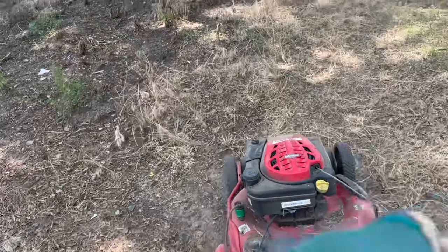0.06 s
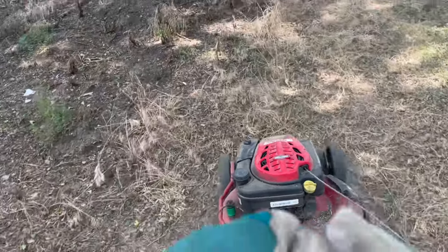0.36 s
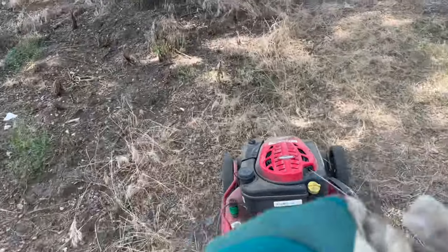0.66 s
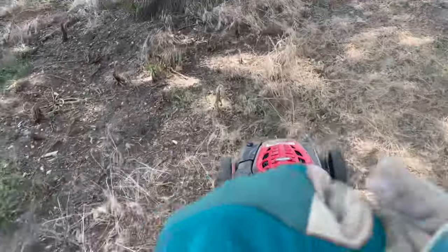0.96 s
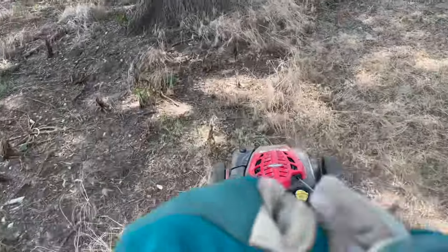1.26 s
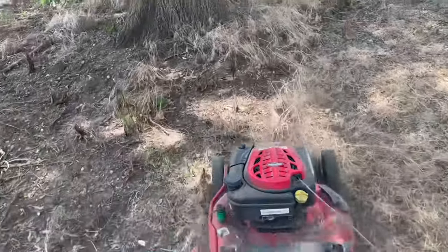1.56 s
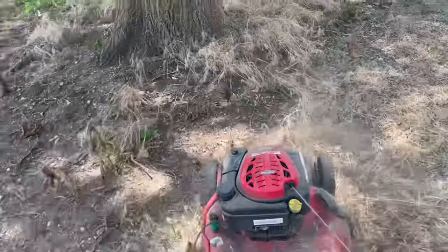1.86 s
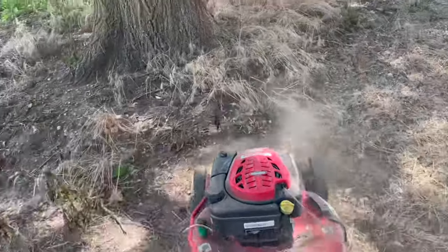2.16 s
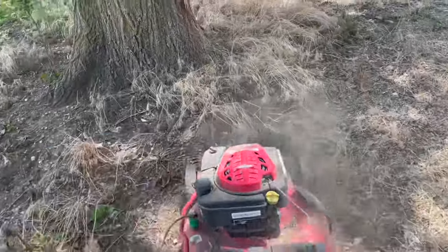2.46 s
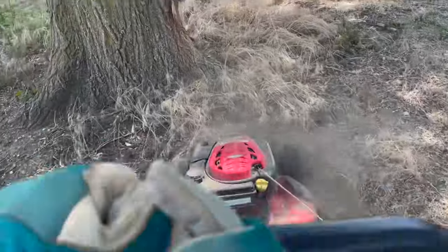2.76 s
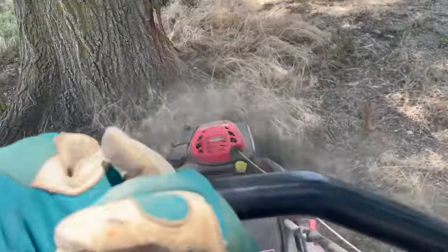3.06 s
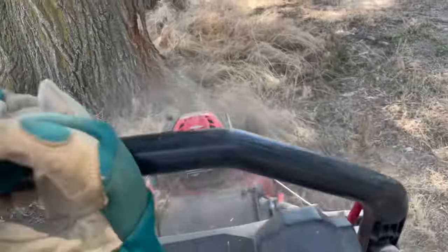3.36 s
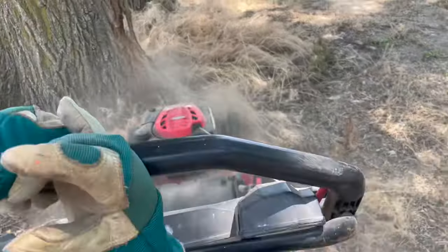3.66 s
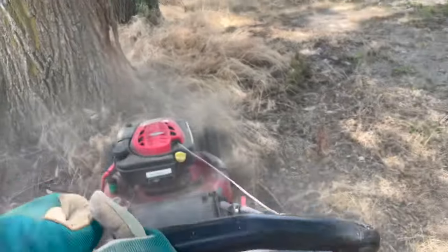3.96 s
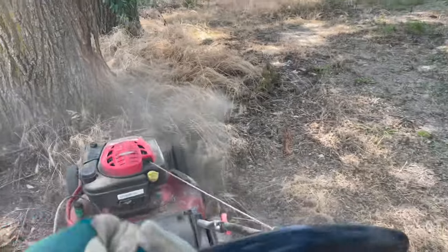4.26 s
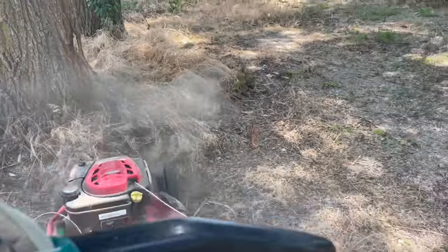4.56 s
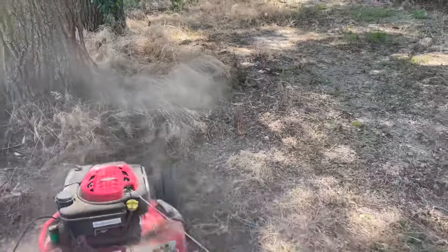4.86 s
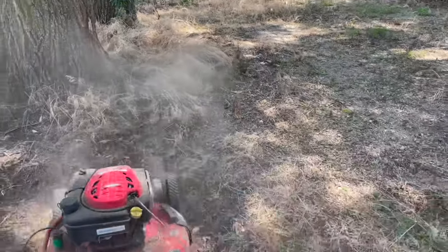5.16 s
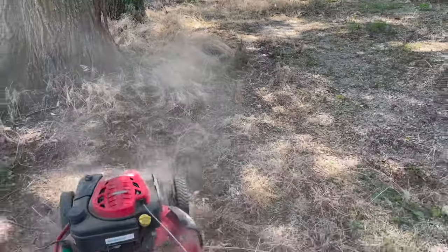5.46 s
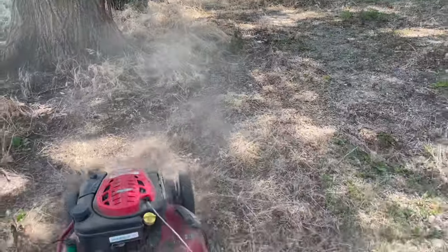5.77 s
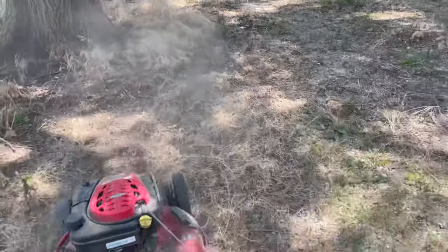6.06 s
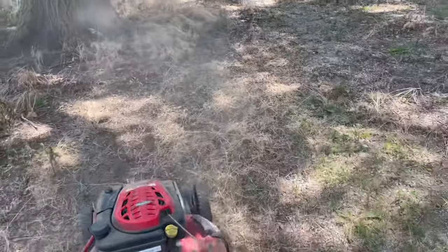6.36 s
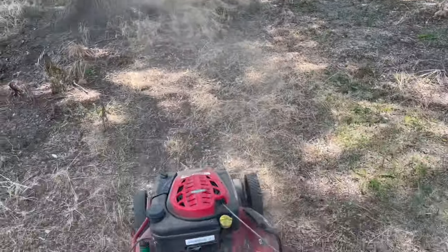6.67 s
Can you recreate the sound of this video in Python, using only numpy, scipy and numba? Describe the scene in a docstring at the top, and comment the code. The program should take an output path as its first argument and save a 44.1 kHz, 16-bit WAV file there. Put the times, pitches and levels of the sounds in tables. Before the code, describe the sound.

A petrol push mower drones steadily through dry grass, stalks crackling and bits of grit and twigs clicking against its steel deck.

```python
"""Petrol push mower in dry grass

Heard from the handle, a single cylinder fires every second turn while a two-ended blade drones and
churns the air under the steel deck. Cut stalks crackle, grit and twigs hit the deck, and the engine
sags and thuds harder in the thick patches. The mower is pushed out to a tree and swung away, which
shifts the hollow colour of its noise."""
import sys
import numpy as np
from scipy import signal
from scipy.fft import rfft, irfft
from scipy.io import wavfile
from scipy.ndimage import uniform_filter1d, map_coordinates
from numba import njit

SR = 44100
rng = np.random.default_rng(int(sys.argv[2]) if len(sys.argv) > 2 else 0)


def dump_mix(stems):
    """Bounce the given channels to the path in sys.argv[1] as a 16-bit WAV at rate SR."""
    frames = np.atleast_2d(stems).T  # one column per channel
    limited = np.clip(frames, -1, 1)  # hard clip at full scale
    pcm = np.round(limited * 32767).astype(np.int16)
    wavfile.write(sys.argv[1], SR, pcm)


N = 296793
TIME = np.arange(N) / SR
GOVERNED_HZ = 49.9  # the crank speed the governor aims for


def undb(db):
    """Decibels to gain."""
    return np.exp(np.asarray(db) * (np.log(10) / 20))


def curves(table):
    """One automation curve for each column after the time."""
    times, *columns = np.transpose(table)
    return [np.interp(TIME, times, column) for column in columns]


def unit(x):
    """Scale to rms 1."""
    return x / np.sqrt(np.mean(x ** 2))


def wander(rate):
    """Smooth random modulation of rms 1 that moves about rate times a second."""
    hold = max(int(SR / rate), 1)
    steps = rng.standard_normal(N)[np.arange(N) // hold]
    return unit(uniform_filter1d(steps, hold))


def colour(x, points, size=16384):
    """Minimum-phase EQ through (f/Hz, level/dB) points."""
    hz, db = np.transpose(points)
    bins_hz = np.maximum(np.arange(size // 2 + 1) * SR / size, 1)
    gain = undb(np.interp(np.log(bins_hz), np.log(hz), db))
    cepstrum = irfft(np.log(gain))
    cepstrum[1:size // 2] *= 2
    cepstrum[size // 2 + 1:] = 0
    impulse = irfft(np.exp(rfft(cepstrum)))
    return signal.fftconvolve(x, impulse)[:N]


# Stereo width, side against mid: f/Hz, level/dB
SIDE_EQ = [(60, 2), (250, -17), (500, -18.5), (1200, -10), (2400, -5.5), (4400, -3), (5700, -0.5),
           (7000, -0.5), (9000, 16), (11000, 1.5), (13000, -77)]
def stereo(mid, side):
    """Left and right: tight in the mids, wide in the treble and the deep bass."""
    return mid + np.array([[1], [-1]]) * colour(side, SIDE_EQ)


def noise_bed(envelope, eq):
    """Stereo noise shaped by an envelope, coloured by a body and normalised."""
    mid, side = (unit(colour(envelope * rng.standard_normal(N), eq)) for _ in range(2))
    return stereo(mid, side)


def jolt(at_s, hz, level_db, half_length_s):
    """A short low thud as the mower jolts."""
    t = TIME - at_s
    return undb(level_db) * np.exp(-(t / half_length_s) ** 2) * np.sin(2 * np.pi * hz * t)


def tails(power, decay_s):
    """Give each spike of power an instant attack and an exponential tail."""
    return signal.lfilter([1], [1, -np.exp(-2 / (decay_s * SR))], power)


def snaps(per_s, grain_db, decay_s):
    """Envelope of randomly timed snaps of uneven size."""
    sizes = undb(grain_db * np.minimum(rng.exponential(size=N), 7))
    hits = rng.random(N) < per_s / SR
    return np.sqrt(tails((sizes * hits) ** 2, decay_s))


# Tone of the snapping stalks and of the fine dust: f/Hz, level/dB
STALK_EQ = [(1000, -10.5), (2500, 2), (3800, 1), (4700, 0.5), (5600, -3.5), (6600, 0), (7600, -4.5),
            (9000, -24.5), (12000, -47)]
DUST_EQ = [(5000, -35), (8800, -20), (10300, 5), (12000, 3), (14000, 7), (16000, 0.5)]
# Fader rides for what the blade chops, before trim: t/s, stalk level/dB, dust level/dB
GRASS_RIDE = [(0, -43, -49), (0.95, -40, -45), (1.55, -36.5, -38.5), (1.82, -33, -36), (2.05, -32, -34.5),
              (2.35, -35, -34.5), (2.5, -38, -44.5), (2.8, -36, -43), (2.92, -35, -40), (3.13, -33.5, -38),
              (3.3, -39.5, -41.5), (3.6, -40, -45), (3.75, -40, -44.5), (3.95, -41.5, -47.5),
              (4.3, -43.5, -51.5), (4.55, -43.5, -50.5), (4.75, -42.5, -47), (5.1, -40.5, -44.5),
              (5.9, -38, -43.5), (6.4, -40, -44.5), (6.73, -40, -50)]
def cutting(turns, stalk_trim_db, dust_trim_db, tuft_db):
    """Dry stalks snap and sand ticks on the deck, in tufts, swept round by the blade."""
    stalk_db, dust_db = curves(GRASS_RIDE)
    feed = undb(tuft_db * wander(70) + 0.1 * np.cos(np.pi * turns))
    breaking = feed * snaps(per_s=3500, grain_db=1.9, decay_s=0.002)
    sand = breaking * snaps(per_s=4000, grain_db=-0.8, decay_s=0.01)
    crackle = undb(stalk_db + stalk_trim_db) * noise_bed(breaking, STALK_EQ)
    hiss = undb(dust_db + dust_trim_db) * noise_bed(sand, DUST_EQ)
    return crackle + hiss


def grass_load(thin_db=-42, thick_db=-28):
    """How full the deck is, 0 to 1, following the stalk fader."""
    stalk_db = curves(GRASS_RIDE)[0]
    return np.clip((stalk_db - thin_db) / (thick_db - thin_db), 0, 1)


# Tone of a hit's transient: f/Hz, level/dB
CRACK_EQ = [(600, 17.5), (1600, 10.5), (4000, 3), (6800, 7), (9000, -1), (11000, 0.5), (14000, -4),
            (16000, 1)]
# Ring of the steel deck: f/Hz, level/dB, t60/s
STEEL_MODES = [(860, -1, .025), (1120, 5, 0.034), (1340, 4, 0.026), (1545, 6.5, 0.029), (2150, -0.5, 0.059),
               (2330, -4, 0.048), (2730, -0.5, .05), (3230, 2, .028), (3640, 3, 0.04), (4190, 3.5, 0.041),
               (5100, -1, .04), (5950, -4, 0.039), (6640, -1, .03)]
# Grit and twig cues: t/s, relative level/dB, ring against that level/dB, ring centre f/Hz
DEBRIS_HITS = [(0.0633, -25, -11, 1800), (0.3007, -22, -14, 1770), (1.4851, -22, -4, 1760),
               (1.514, -22, -8, 1790), (1.8467, -19, -14, 2300), (1.881, -21, -18, 2300),
               (1.9526, -17, -11, 1947), (2.0881, -14, -15, 4140), (2.111, -11, -5, 2110),
               (2.1133, -19, 7, 1300), (2.1145, -22, 6, 2175), (2.142, -16.5, -27, 1680),
               (2.198, -12, -20, 4330), (2.2123, -20, -10, 3600), (2.2185, -22, -4, 3650),
               (2.323, -16, -30, 1402), (2.39, -13.5, -11, 1390), (2.3965, -14.5, -24, 1394),
               (2.579, -21.5, 0, 2300), (2.9176, -13, -12, 1831), (2.941, -19.5, -5, 3500),
               (2.9995, -19, -13, 1793), (3.145, -19, -13, 4100), (3.1643, -14, -5, 2800),
               (3.291, -19, -9, 1603), (3.355, -24, -23, 2285), (3.7, -18.5, -9, 1680),
               (3.7329, -23, -20, 1665), (3.8183, -16, -15, 1694), (4.409, -23, -8, 2900),
               (5.1068, -23.5, -19, 1460), (5.187, -19.5, -9, 1410), (5.2591, -26, -20, 1460),
               (5.6161, -29, -14, 2300), (5.65, -25, -10, 4120)]
def debris(crack_db, tick_db, crack_s, skitter_db, skitter_s, focus_db_per_octave, lightest_ring_db):
    """Each piece cracks on the deck, rings the modes near its pitch and skitters; light grit ticks."""
    cracks, ticks, rings = np.zeros((3, N))
    t = TIME[:SR // 10]
    attack = 1 - np.exp(-t / 0.0005)
    burst = attack * (np.exp(-t / crack_s) + undb(skitter_db) * np.exp(-t / skitter_s))
    for at_s, hit_db, ring_db, centre_hz in DEBRIS_HITS:
        span = slice(int(at_s * SR), int(at_s * SR) + len(t))
        steel = 0
        for hz, db, t60 in STEEL_MODES:
            mode_db = db - focus_db_per_octave * abs(np.log2(hz / centre_hz))
            steel += undb(mode_db - 60 * t / t60) * np.sin(2 * np.pi * (hz * t + rng.random()))
        lightness = np.clip(ring_db / lightest_ring_db, 0, 1)  # less ring means a lighter piece
        cracks[span] += undb(hit_db) * np.sqrt(1 - lightness) * burst
        ticks[span] += undb(hit_db) * lightness * burst
        rings[span] += undb(hit_db + ring_db) * attack * steel
    crack = stereo(*(colour(cracks * rng.standard_normal(N), CRACK_EQ) for _ in range(2)))
    tick = stereo(*(colour(ticks * rng.standard_normal(N), DUST_EQ) for _ in range(2)))
    return undb(crack_db) * crack + undb(tick_db) * tick + rings


# The mower's path out to the tree and away: t/s, distance/m
MOWER_PATH = [(0, 1.28), (2.3, 1.46), (3.1, 1.59), (3.65, 1.55), (4.4, 1.5), (6.73, 1.59)]
def nearness_db(handle_m=1.5):
    """Level falls with distance, 0 dB at a handle's length."""
    return 20 * np.log10(handle_m / curves(MOWER_PATH)[0])


def fader_db(before_db, after_db, grass_db):
    """A layer's level: it crossfades over the swing and follows grass load and distance."""
    swing_s = (3.8, 4.52)
    return np.interp(TIME, swing_s, (before_db, after_db)) + grass_db * grass_load() + nearness_db()


# Tone of the loose metal: f/Hz, level/dB
CLATTER_EQ = [(900, -35), (1500, 3), (1850, 1), (2150, 0), (2450, -1.5), (2800, -5), (3200, -9),
              (4200, -10.5), (9000, -61)]
def clatter(turns, knock_db, knock_s, scatter_db, slack_turns):
    """Loose metal rattles steadily and knocks once a turn, uneven in time and force."""
    due_turns = np.arange(turns[-1]) + 0.7
    timing, force = rng.standard_normal((len(due_turns), 2)).T
    at = np.interp(due_turns + slack_turns * timing, turns, np.arange(N)).astype(int)
    knocks = np.zeros(N)
    knocks[at] = undb(knock_db + scatter_db * force)
    rattle = np.sqrt(1 + tails(knocks ** 2, knock_s)) * undb(1.1 * wander(400))
    return undb(fader_db(-35.5, -36, grass_db=2)) * noise_bed(rattle, CLATTER_EQ)


# Low roar and midrange rush of the air under the deck: f/Hz, level/dB
ROAR_EQ = [(25, -44), (45, -14), (70, -10), (120, -8.5), (170, -2.5), (270, 0.5), (420, 2), (560, -5),
           (700, -7), (1100, -19), (3000, -75)]
RUSH_EQ = [(300, -40.5), (550, 0), (760, 3.5), (1100, 2), (1330, -3), (1600, -6.5), (2500, -28.5),
           (6000, -102.5)]
def deck_air(turns, chop_db, sway_db, throb_db, gust_db):
    """Air torn by the blade pulses at each pass, one tip a little harder than the other."""
    chop = chop_db * np.cos(4 * np.pi * turns)  # every tip
    sway = sway_db * np.cos(2 * np.pi * turns)  # every turn
    throb = throb_db * np.cos(np.pi * (turns - 1))  # every engine cycle
    roar_db = fader_db(-21.5, -20, grass_db=3) + gust_db * wander(5)
    rush_db = fader_db(-24.5, -24.5, grass_db=-1)
    roar = noise_bed(undb(chop + wander(60)), ROAR_EQ)
    rush = noise_bed(undb(chop + sway + throb + 1.3 * wander(250)), RUSH_EQ)
    return undb(roar_db) * roar + undb(rush_db) * rush


@njit
def swept_band(x, hz, width_hz):
    """State-variable band-pass with unity gain at its moving centre."""
    out, band, low = np.empty(len(x)), 0., 0.
    for i in range(len(x)):
        tuning, damping = np.tan(np.pi * hz[i] / SR), width_hz / hz[i]
        passed = (band + tuning * (x[i] - low)) / (1 + tuning * (tuning + damping))
        band, low = 2 * passed - band, low + 2 * tuning * passed
        out[i] = damping * passed
    return out


# Swept dips and peaks in the deck noise: f/Hz at each of five headings, width/Hz, level/dB
HOLLOW_BANDS = [(446, 450, 420, 330, 420, 81, -1), (630, 570, 660, 620, 690, 155, -5),
                (745, 660, 610, 730, 990, 170, -1), (1040, 1070, 1020, 1120, 1266, 130, 2.5),
                (1210, 1060, 1450, 990, 950, 110, -4.5), (1560, 1500, 1780, 1680, 1595, 205, -9),
                (1780, 1720, 1900, 1756, 1930, 155, 3), (2140, 2200, 2506, 2370, 2127, 140, -2),
                (2350, 2150, 2378, 2900, 2670, 210, 4), (2700, 2370, 3000, 3500, 3300, 270, -4.5),
                (3950, 4000, 3450, 3700, 4000, 400, 2), (5600, 5500, 5200, 6400, 5983, 700, -1)]
def hollows(x):
    """The deck's hollow colour glides as the mower nears the tree and swings round."""
    headings_s = (1.0, 2.4, 3.55, 4.2, 4.7)  # heading in, close, at the tree, swinging, heading away
    for *hz, width_hz, db in HOLLOW_BANDS:
        centre_hz = np.interp(TIME, headings_s, hz)
        x = x + (undb(db) - 1) * swept_band(x, centre_hz, float(width_hz))
    return x


# Dips and swells of single tones in the hum: t/s, half length/s, level/dB, f/Hz
TONE_SWELLS = [(0.3, 0.26, 1, 500), (0.4, 0.62, 3, 175), (0.62, 0.11, -5, 300), (1.308, 0.088, -4, 200.3),
               (1.976, 0.42, 3.5, 300), (2.187, 0.45, -5.5, 100), (2.184, 0.06, -25, 200),
               (2.25, 0.49, 5, 125), (2.29, 0.056, 14, 400), (2.304, 0.03, 5, 200), (2.45, 0.52, -7, 75),
               (2.476, .05, -22, 200), (2.88, 0.053, 6.5, 200), (3.03, 0.066, -5, 200),
               (3.056, 0.14, -15, 500), (3.1, .15, -5, 600), (3.264, 0.066, 9.5, 300),
               (3.449, 0.13, -18, 100), (3.45, 0.27, -3, 175), (3.646, 0.38, 2.5, 500),
               (3.719, 0.2, -12, 100), (3.75, 0.25, -4, 200), (3.756, 0.5, -11, 300),
               (3.793, 0.07, 12.5, 400), (3.896, 0.11, -6, 200), (4.25, 0.14, -12, 400),
               (4.3, 0.31, -1, 125), (4.84, 0.53, -2.5, 100), (5.052, 0.11, -13, 199.6),
               (5.1, 0.16, 6, 500), (5.658, 0.15, -22, 400), (5.94, 0.12, 8.5, 500),
               (6.579, 0.072, 8.5, 300), (6.649, 0.18, 9, 178)]
def swell_db(hz, width_octaves=0.1):
    """An engine or blade tone fades or swells for a moment at each cue near its pitch."""
    out = np.zeros(N)
    for at_s, half_s, db, centre_hz in TONE_SWELLS:
        octaves = np.log2(hz / centre_hz)
        if abs(octaves) < 1:
            near = abs(TIME - at_s) < np.pi * half_s
            out[near] += db * np.exp(-((TIME[near] - at_s) / half_s) ** 2 - (octaves / width_octaves) ** 2)
    return out


def firing(turns, chamber_eq, scatter_db, jitter_s):
    """One puff every second turn rings a chamber; no two are alike."""
    fired_s = np.interp(np.arange(1, turns[-1], 2), turns, TIME)
    timing, force = rng.standard_normal((len(fired_s), 2)).T
    at = np.clip((fired_s + jitter_s * timing) * SR, 0, N - 1).astype(int)
    puffs = np.zeros(N)
    puffs[at] = undb(scatter_db * force)
    return unit(colour(puffs, chamber_eq))


# Body of the air box and of the silencer: f/Hz, level/dB
AIR_BOX_EQ = [(27, -23), (48, 12.5), (76, 13.5), (100, 9.5), (150, -20.5), (500, -87)]
SILENCER_EQ = [(40, -53.5), (75, -15.5), (100, 4), (124, 8), (150, -7.5), (175, 5), (200, -14),
               (250, -10.5), (370, -2.5), (460, -17.5), (620, -24), (1100, -18), (1700, -33.5), (5000, -95)]
def engine(turns, speed_hz, droop_hz):
    """The air box thuds and the silencer barks once a cycle, harder in thick grass."""
    throttle = np.tanh((GOVERNED_HZ - speed_hz) / droop_hz)  # the governor opens as the speed sags
    intake_db = -27.5 - 0.6 * throttle + 3 * grass_load() + nearness_db()
    exhaust_db = -24.5 + 0.5 * grass_load() + nearness_db()
    thuds = firing(turns, AIR_BOX_EQ, scatter_db=0.6, jitter_s=0.0001)
    barks = firing(turns, SILENCER_EQ, scatter_db=1.0, jitter_s=0.00007)
    out = undb(intake_db) * thuds + undb(exhaust_db) * barks
    for hz in GOVERNED_HZ * np.array([1.5, 2.5, 3.5]):  # three low tones fade and swell
        tone = signal.filtfilt(*signal.iirpeak(hz, hz / 20, fs=SR), out)
        out = out + (undb(swell_db(hz)) - 1) * tone
    return out


# Blade harmonics 1 to 8: level before the swing/dB, level after it/dB, lift in thick grass/dB
BLADE_HARMONICS = [(-20, -20.5, 2), (-20.5, -19.5, -2), (-23.5, -30, -0.5), (-38.5, -29.5, 10.5),
                   (-26.5, -26, -5.5), (-35, -28, 1), (-49, -49, 11), (-44, -50, -14)]
def blade(turns, flutter_rad, spread_rad, waver_db):
    """Two tips pass per turn and drone; eddies shake each pass, the high harmonics most."""
    phase = 4 * np.pi * turns + flutter_rad * wander(70)
    out = 0
    for k, levels in enumerate(BLADE_HARMONICS, 1):
        waver = waver_db * np.sqrt(k) * wander(20)
        db = fader_db(*levels) + swell_db(2 * k * GOVERNED_HZ) + waver
        offset = spread_rad * k ** 2 * np.array([[1], [-1]])  # left and right slightly out of step
        out = out - np.sqrt(2) * undb(db) * np.sin(k * phase + offset)
    return out


# Stereo image as the mower turns past the tree: t/s, right-side delay/ms
SWING_DELAY = [(0, 0), (1.6, 0.012), (2.9, 0.03), (4, 0.094), (4.45, 0.15), (5.8, 0.097), (6.73, 0.055)]
def swing(pair):
    """The mower reaches the left side first as it swings round."""
    left, right = pair
    lag = curves(SWING_DELAY)[0] * SR / 1000
    return np.array([left, map_coordinates(right, [np.arange(N) - lag], order=2)])


# Crankshaft speed, sagging and recovering: t/s, f/Hz
CRANK_SPEED = [(0.0, 49.9), (0.16, 49.43), (0.48, 49.68), (0.8, 50), (0.96, 49.58), (1.2, 48.82),
               (1.68, 48.82), (1.84, 48.8), (2.08, 48), (2.32, 48.8), (2.48, 48.57), (2.8, 50.4),
               (2.96, 50.5), (3.12, 49.6), (3.28, 49.24), (3.45, 50.08), (3.53, 49.44), (3.77, 50.8),
               (3.93, 52.1), (4.01, 51.45), (4.09, 51.34), (4.25, 50.67), (4.33, 50.5), (4.57, 49.1),
               (4.73, 49.45), (4.89, 49.27), (4.97, 49), (5.05, 49.38), (5.21, 49.36), (5.29, 49.8),
               (5.77, 50.16), (5.93, 50.44), (6.25, 49.6), (6.41, 49.3), (6.49, 48.75), (6.73, 48.92)]
def scene():
    """The crankshaft clocks the mower's layers; debris hits and one jolt land on top."""
    speed_hz = curves(CRANK_SPEED)[0]
    start_turns, puff_lead_turns = 0.1412, 0.1132  # the puff comes just ahead of a blade tip
    turns = np.cumsum(speed_hz) / SR - start_turns
    metal = clatter(turns, knock_db=6.5, knock_s=0.004, scatter_db=1.8, slack_turns=0.05)
    air = deck_air(turns, chop_db=-1.4, sway_db=0.1, throb_db=-0.1, gust_db=1.0)
    deck = np.array([hollows(channel) for channel in metal + air])
    beat = engine(turns + puff_lead_turns, speed_hz, droop_hz=0.9)
    drone = blade(turns, flutter_rad=0.035, spread_rad=0.0012, waver_db=0.5)
    grass = cutting(turns, stalk_trim_db=0.53, dust_trim_db=2.5, tuft_db=1.5)
    hits = debris(crack_db=-7.0, tick_db=1.0, crack_s=0.0031, skitter_db=-14, skitter_s=0.016,
                  focus_db_per_octave=23.5, lightest_ring_db=-39.0)
    thud = jolt(at_s=6.525, hz=70, level_db=-16.5, half_length_s=0.015)
    return swing(deck + beat + drone) + grass + hits + thud


# Tonal balance, left against right: f/Hz, level/dB
BALANCE_EQ = [(60, -1.5), (110, -1.5), (200, -1.5), (380, -2.0), (700, 0.0), (1290, 2.0), (2380, 0.5),
              (4400, 1.0), (8120, 0.0), (15000, 0.0)]
def record(dry, ceiling=0.8, top_hz=15800):
    """Master bus: a slightly different EQ on each side, a soft clip and a steep high cut."""
    left = colour(dry[0], [(hz, db / 2) for hz, db in BALANCE_EQ])
    right = colour(dry[1], [(hz, -db / 2) for hz, db in BALANCE_EQ])
    pair = np.array([left, right])
    rounded = pair / (1 + (pair / ceiling) ** 8) ** (1 / 8)
    high_cut = signal.ellip(10, 0.2, 80, top_hz, fs=SR, output="sos")
    return signal.sosfilt(high_cut, rounded)


dry = scene()
out = record(dry)
dump_mix(out)
```